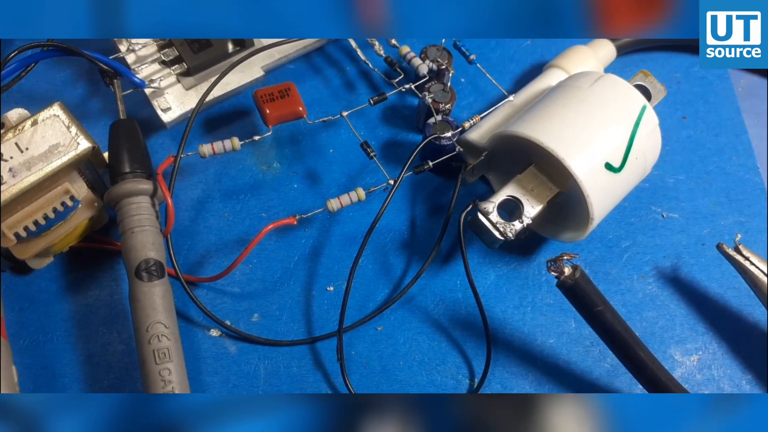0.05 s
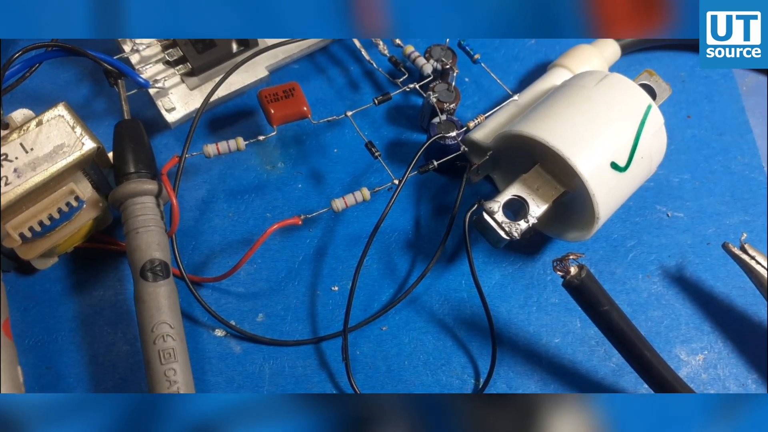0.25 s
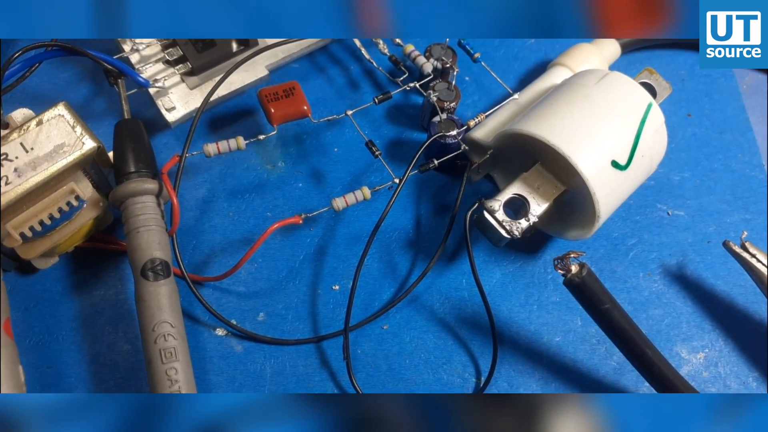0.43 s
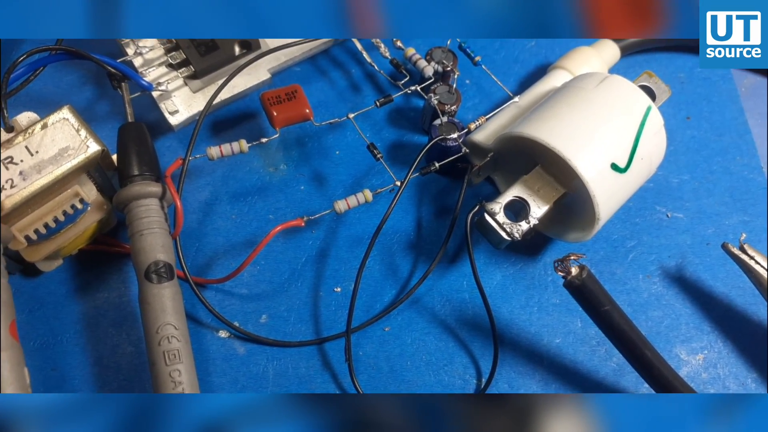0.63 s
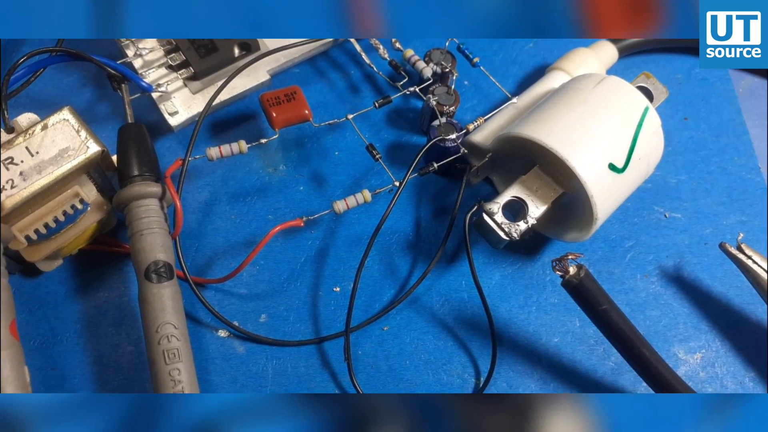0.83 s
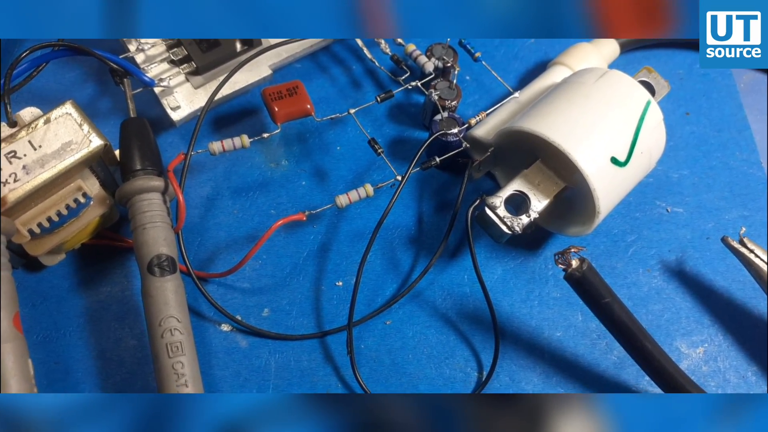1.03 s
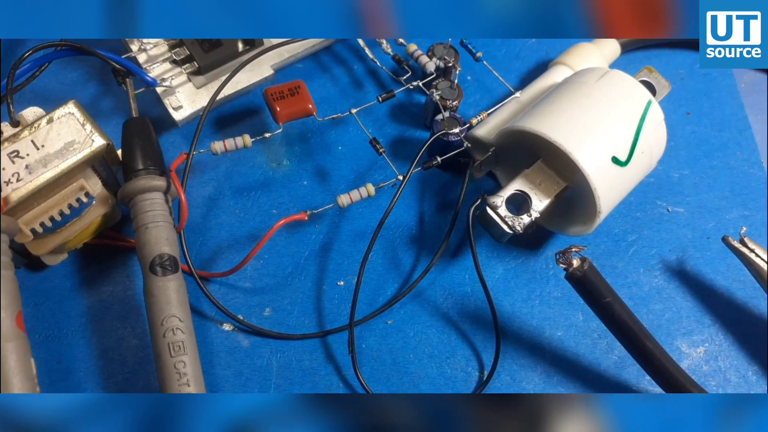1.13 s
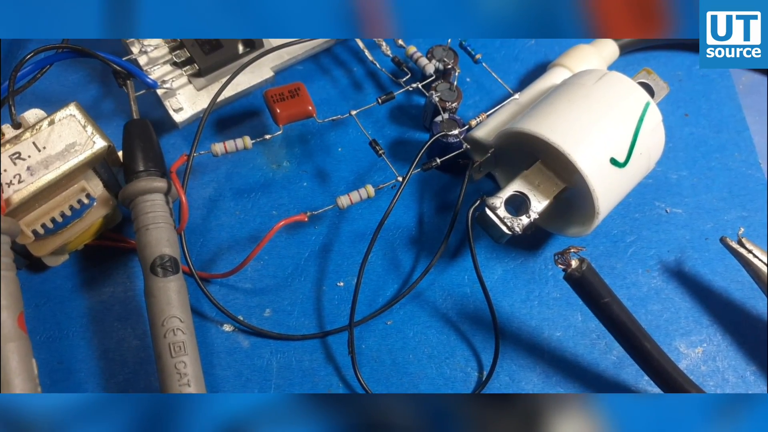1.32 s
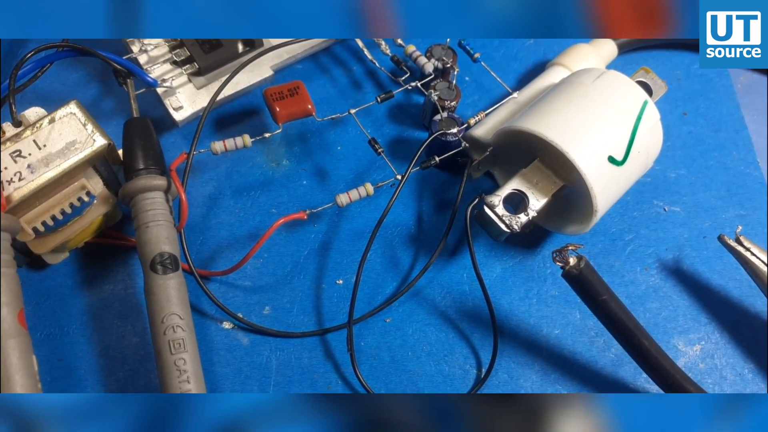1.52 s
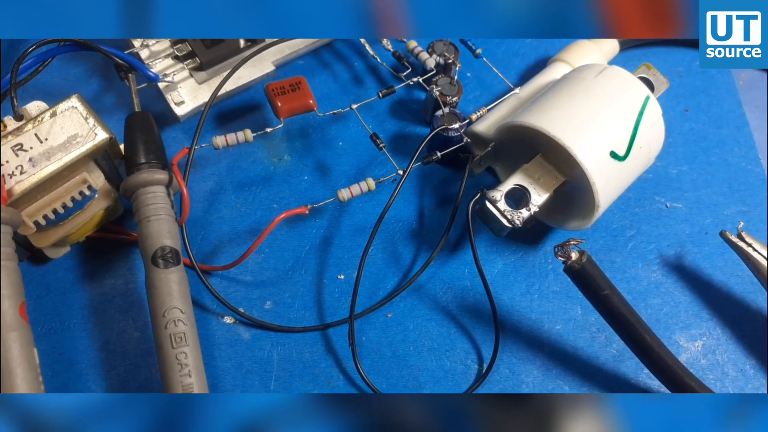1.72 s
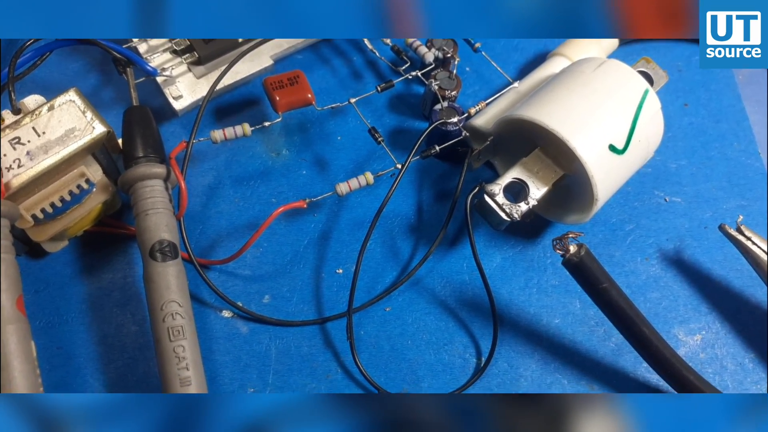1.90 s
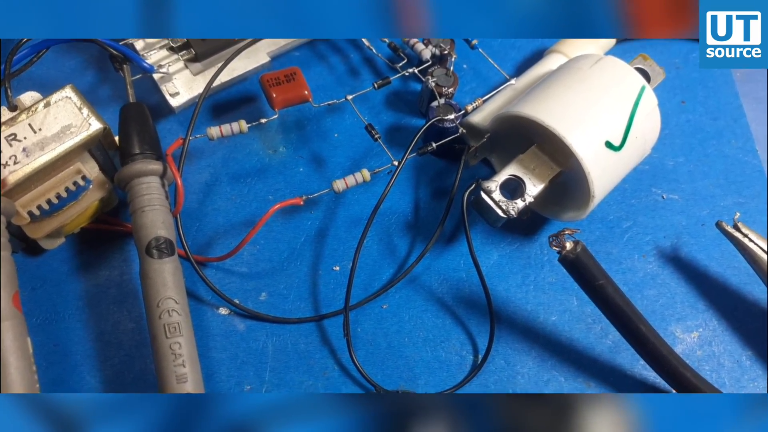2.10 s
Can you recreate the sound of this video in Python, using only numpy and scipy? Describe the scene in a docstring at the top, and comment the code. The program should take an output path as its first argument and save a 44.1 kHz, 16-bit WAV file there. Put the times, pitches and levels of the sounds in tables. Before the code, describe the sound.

A single high-voltage spark snaps very close to a phone's stereo microphones, with a tiny low thump and a short bright room tail, then only faint hum, soft rumble, hiss and a thin sliding whine.

```python
"""One high-voltage spark snaps across a gap on a workbench, close to a phone with two unlike microphones.
Its shock rings each microphone port, scatters off the bench clutter and fills a small hard room as
decaying noise; a push of air and a sinking low thump go with it. The charging circuit whines faintly
as ringing ticks, a motor hums low somewhere as a sine, and shaped noise makes room rumble, thin hiss,
a band of airy hiss that comes and goes, and one faint rustle."""
import sys
import numpy as np
from scipy import signal
from scipy.fft import rfft, irfft, next_fast_len
from scipy.io import wavfile
from scipy.ndimage import uniform_filter1d, map_coordinates

SR = 44100
rng = np.random.default_rng(int(sys.argv[2]) if len(sys.argv) > 2 else 0)


def wav_record(signal):
    """Record a signal, one row per channel, as 16-bit PCM in the file named by sys.argv[1]."""
    frames = np.transpose(np.atleast_2d(signal))
    bounded = np.clip(frames, -1, 1)
    # unit amplitude maps onto the largest positive 16-bit level
    quanta = np.round(bounded * 32767).astype(np.int16)
    wavfile.write(sys.argv[1], SR, quanta)


N = 94815
SPARK_S = 0.2120
# Pairs of values are [left, right] microphone throughout.


def amp(db):
    """Linear gain of a level in dB."""
    return 10 ** (np.asarray(db) / 20)


def column(v):
    """One value per microphone, as a column."""
    return np.reshape(v, (-1, 1))


def seconds():
    """Time axis."""
    return np.arange(N) / SR


def since_spark():
    """Seconds after the spark, negative before it."""
    return seconds() - SPARK_S


def over_time(points):
    """Straight lines through (s, value) points."""
    return np.interp(seconds(), *np.transpose(points))


def along(points, hz):
    """Columns of (Hz, value, ..) points on a log frequency axis."""
    f, *cols = np.transpose(points)
    return np.array([np.interp(np.log(hz + 1), np.log(f + 1), c) for c in cols])


def filtered(x, response):
    """x times a complex response of frequency, zero-padded."""
    m = next_fast_len(N + SR // 2)
    hz = np.fft.rfftfreq(m, 1 / SR)
    return irfft(rfft(x, m) * response(hz), m)[..., :N]


def delay(hz, ms):
    """Response of a delay for each microphone."""
    return np.exp(-2j * np.pi * hz * column(ms) / 1000)


def rings(table, f):
    """Sum of resonances (Hz, width Hz, dB) with alternating sign."""
    total = 0
    for k, (center, width, db) in enumerate(table):
        resonance = 1j * f * width / (center * center - f * f + 1j * f * width)
        total = total + (-1) ** k * amp(db) * resonance
    return total


def density(points):
    """Gain that gives white noise of rms 1 the tabled level per Hz."""
    return lambda hz: amp(along(points, hz)) * np.sqrt(SR / 2)


def unit(x):
    """x scaled to rms 1."""
    return x / np.sqrt(np.mean(x ** 2))


def patchy(count, depth_db):
    """White noises that share slow time-frequency patches of random gain, rms depth in dB."""
    z = signal.stft(rng.standard_normal((count, N)), nperseg=512)[2]
    field = rng.standard_normal(z.shape[1:])
    field = uniform_filter1d(field, 6, 0)  # across frequency
    field = uniform_filter1d(field, 14, 1)  # across time
    return signal.istft(z * amp(depth_db * unit(field)), nperseg=512)[1][:, :N]


def band(points):
    """Stereo noise of rms 1, zero outside the first and last frequency."""
    def response(hz):
        inside = (hz > points[0][0]) * (hz < points[-1][0])
        return amp(along(points, hz)) * inside
    return unit(filtered(rng.standard_normal((2, N)), response))


# Rumble and hiss spectrum before the swell: freq_hz, left_db_per_hz, right_db_per_hz
FLOOR_SPECTRUM = [(30, -108, -106), (44.6, -94.5, -92), (80, -97.5, -89), (160, -100, -94),
                  (230.3, -105, -100), (346, -107, -104), (520, -105, -101), (717, -106, -107),
                  (850, -111, -112), (1450, -112, -112), (2040, -119, -117), (4400, -124, -121),
                  (5900, -124, -119), (6800, -117, -111), (7205, -110, -106), (7600, -116, -115),
                  (8700, -116, -116), (9215, -121, -128), (9900, -122, -130), (10300, -125, -128),
                  (15500, -126, -127)]
# Power common to both microphones: freq_hz, share (limited to 0..1)
COMMON_SHARE = [(60, 0.36), (450, 1), (1200, 0.21), (3000, .15), (9000, 0.071)]
# Rumble level: time_s, gain_db
RUMBLE_SWELL = [(0, 0.5), (.12, 1), (.5, 0), (.62, 2), (0.751, 0.5), (1.2, 0), (1.38, 0), (1.48, 5.5),
                (1.6, -3), (1.93, 1), (2.15, -0.5)]
SWELL_BELOW_HZ, LEFT_LEADS_MS = 680, 0.41


def floor(patchy_db=1.1):
    """Rumble and hiss in slow patches; the common part reaches the left first, the rumble swells."""
    noise = patchy(count=3, depth_db=patchy_db)
    level = density(FLOOR_SPECTRUM)

    def share(hz):
        return np.clip(along(COMMON_SHARE, hz), 0, 1)

    own = filtered(noise[:2], lambda hz: np.sqrt(1 - share(hz)) * level(hz))
    common = filtered(noise[2], lambda hz: np.sqrt(share(hz)) * level(hz) * delay(hz, [0, LEFT_LEADS_MS]))
    steady = own + common
    rumble = filtered(steady, lambda hz: 1 / (1 + (hz / SWELL_BELOW_HZ) ** 4))
    return steady + (amp(over_time(RUMBLE_SWELL)) - 1) * rumble


# Hum rms before waver and balance: time_s, level_db
HUM_LEVEL = [(0, -63.5), (.3, -64), (.8, -64.5), (1.3, -63.5), (1.9, -60), (2.15, -65)]
HUM_HZ = 48.86


def hum(waver_db=0.08):
    """Motor hum: a sine with slight level waver, in phase and nearly equal in both microphones."""
    t = seconds()
    waver = map_coordinates(rng.standard_normal(30), [t * 10])  # 10 random points a second
    level_db = over_time(HUM_LEVEL) + waver_db * waver + column([-0.3, 0.3])
    return np.sqrt(2) * amp(level_db) * np.sin(2 * np.pi * (HUM_HZ * t + rng.random()))


# Charging ticks, slowing except for a jump up at the spark: time_s, rate_hz
TICK_RATE = [(0, 530), (.21, 516), (.215, 860), (.52, 771), (.78, 707), (1.09, 652), (1.42, 606),
             (1.75, 565), (2.15, 523)]
# Resonances the ticks pass twice: center_hz, width_hz, level_db (per pass)
TICK_RINGS = [(8330, 330, 0), (8870, 260, -2), (9950, 350, -3), (10600, 400, -6)]
CHARGER_RMS_DB = [-89, -104]


def charger():
    """Ticks of the charging circuit, heard only where they ring: thin tones that slide with the rate."""
    turns = np.cumsum(over_time(TICK_RATE)) / SR
    harmonics = np.arange(8, 23)[:, None]
    ticks = np.cos(2 * np.pi * harmonics * turns).sum(axis=0)
    whine = filtered(ticks, lambda hz: rings(TICK_RINGS, hz) ** 2)
    return column(amp(CHARGER_RMS_DB)) * unit(whine)


# Band shape before scaling to rms 1: freq_hz, gain_db
AIRY_SHAPE = [(4300, -30), (4800, -0.5), (6000, 3.5), (6600, -20)]
# Right microphone: time_s, level_db
AIRY_LEVEL = [(0, -91), (.12, -85), (.55, -78.5), (.72, -79), (.8, -91.5), (1.1, -89), (1.3, -84),
              (1.5, -88), (1.749, -85), (2, -95), (2.15, -87.5)]
AIRY_LEFT_REL_DB = -13.5


def airy():
    """A faint noise band that comes and goes, mostly on the right."""
    level_db = over_time(AIRY_LEVEL) + column([AIRY_LEFT_REL_DB, 0])
    return amp(level_db) * band(AIRY_SHAPE)


# Port resonances, before SHOCK_DB: center_hz, width_hz, level_db
LEFT_PORT = [(5070, 1200, -4.5), (6980, 970, -1.5), (8816, 1100, 2.5), (13295, 1200, -3),
             (15350, 800, -4.5)]
RIGHT_PORT = [(3464, 890, -16.5), (5086, 645, -8), (6620, 780, 5), (7950, 1700, 4.5), (15290, 2000, -11.5)]
# Copies off bench and parts, relative to the direct shock:
# left_later_ms, right_later_ms, left_db, right_db
BENCH_BOUNCES = [(.3, 0.32, -6.5, -6), (.55, .62, -8.5, -12), (.85, .9, -7, -3.5)]
ARRIVE_AFTER_SPARK_MS, SHOCK_DB = [0.092, 0.042], [3.5, 3]


def shock():
    """One sharp front and its first bounces ring the microphone ports."""
    def path(hz):
        copies = 1
        for left_ms, right_ms, left_db, right_db in BENCH_BOUNCES:
            copies = copies + column(amp([left_db, right_db])) * delay(hz, [left_ms, right_ms])
        ports = np.array([rings(LEFT_PORT, hz), rings(RIGHT_PORT, hz)])
        arrival = delay(hz, np.add(ARRIVE_AFTER_SPARK_MS, SPARK_S * 1000))
        return column(amp(SHOCK_DB)) * ports * copies * arrival

    impulse = np.arange(N) == 0
    return filtered(impulse, path)


# One row per microphone, level before the low cut:
# start_after_spark_ms, rise_ms, peak_db, low_cut_hz, low_cut_q
AIR_PUSH = [(.08, 0.95, 9.5, 1748, 1.13), (.2, 0.24, -15.5, 10, .7)]


def push():
    """Heated air gives one short push, which each microphone's low cut reshapes."""
    start_ms, rise_ms, peak_db, cut_hz, q = map(column, np.transpose(AIR_PUSH))
    u = np.clip((since_spark() * 1000 - start_ms) / rise_ms, 0, None)
    pulse = amp(peak_db) * u * np.exp(1 - u)  # peaks at u = 1
    return filtered(pulse, lambda f: -f * f / (cut_hz * cut_hz - f * f + 1j * f * cut_hz / q))


# Room tail at its start: freq_hz, left_db_per_hz, right_db_per_hz
ROOM_SPECTRUM = [(60, -94.5, -86), (250, -89.5, -86.5), (450, -85, -87), (650, -89.5, -88.5),
                 (900, -87.5, -89.5), (1300, -84, -82.5), (2300, -79.5, -79.5), (4200, -81, -77),
                 (5030, -78, -70.5), (6000, -75, -70.5), (8840, -71, -71.5), (9600, -76, -80),
                 (10590, -74, -78.5), (12500, -74, -77), (15600, -78, -79)]
# Room tail decay: freq_hz, t60_s
ROOM_DECAY = [(200, .45), (900, 0.6), (3000, .52), (5500, .52), (9000, 0.43), (12000, .42), (15000, 0.47)]
# Relative to ROOM_SPECTRUM
NEAR_WALLS_DB, NEAR_WALLS_T60_S = [6.5, 5.5], [0.04, 0.044]
CLUTTER_DB, CLUTTER_T60_S = [17, 17], [0.013, 0.01]
ECHO_RISE_S = 0.0003


def echoes(uneven_db=2.0):
    """Bench scatter, near walls and the room's tail: noises each dying at its own speed."""
    t = np.clip(since_spark(), 0, None)

    def noise():
        return filtered(patchy(count=2, depth_db=uneven_db), density(ROOM_SPECTRUM))

    def dying(level_db, t60_s):
        return amp(column(level_db) - 60 * t / column(t60_s)) * noise()

    hz, frame_s, z = signal.stft(noise(), SR, nperseg=256)
    age_s = np.maximum(frame_s, SPARK_S / 2) - SPARK_S  # bounds the gain before the spark
    decay = amp(-60 * age_s / along(ROOM_DECAY, hz).T)
    tail = signal.istft(z * decay, SR, nperseg=256)[1][:, :N]
    near_walls = dying(NEAR_WALLS_DB, NEAR_WALLS_T60_S)
    clutter = dying(CLUTTER_DB, CLUTTER_T60_S)
    onset = 1 - np.exp(-t / ECHO_RISE_S)  # silent before the spark
    return (tail + near_walls + clutter) * onset


THUMP_AFTER_SPARK_MS, THUMP_DB = 1.2, [-34, -20.5]  # level before the fade
THUMP_POLARITY = [0.98, -1]  # gain and direction of the first swing
THUMP_START_HZ, THUMP_END_HZ, THUMP_SINK_S = 150, 41, 0.0072
THUMP_FADE_S, THUMP_FADE_SHAPE = 0.023, 2.2  # shape 1 fades at once, 2 holds first


def thump():
    """A soft low swing follows the snap and sinks in pitch, opposite in the two microphones."""
    t = np.clip(since_spark() - THUMP_AFTER_SPARK_MS / 1000, 0, None)
    sink_turns = (THUMP_START_HZ - THUMP_END_HZ) * THUMP_SINK_S * (1 - np.exp(-t / THUMP_SINK_S))
    turns = THUMP_END_HZ * t + sink_turns
    fade = np.exp(-(t / THUMP_FADE_S) ** THUMP_FADE_SHAPE)
    return column(amp(THUMP_DB) * THUMP_POLARITY) * fade * np.sin(2 * np.pi * turns)


# Band shape before scaling to rms 1: freq_hz, gain_db
RUSTLE_SHAPE = [(2500, -25), (2850, 0), (3600, -3), (4100, -25)]
RUSTLE_START_S, RUSTLE_HOLD_S, RUSTLE_T60_S = 1.705, 0.041, 0.22
RUSTLE_DB = [-94, -82]


def rustle():
    """One faint noise band starts at once, holds, then fades exponentially."""
    t = seconds() - RUSTLE_START_S
    fade_db = -60 * np.clip(t - RUSTLE_HOLD_S, 0, None) / RUSTLE_T60_S
    return (t > 0) * amp(column(RUSTLE_DB) + fade_db) * band(RUSTLE_SHAPE)


def scene():
    """Sum of all sources, left and right."""
    background = floor() + hum() + charger() + airy()
    spark = shock() + push() + echoes() + thump()
    return background + spark + rustle()


TOP_HZ = 15750


def record(dry):
    """Nothing is kept at or above the band limit."""
    return filtered(dry, lambda hz: hz < TOP_HZ)


dry = scene()
out = record(dry)
wav_record(out)
```